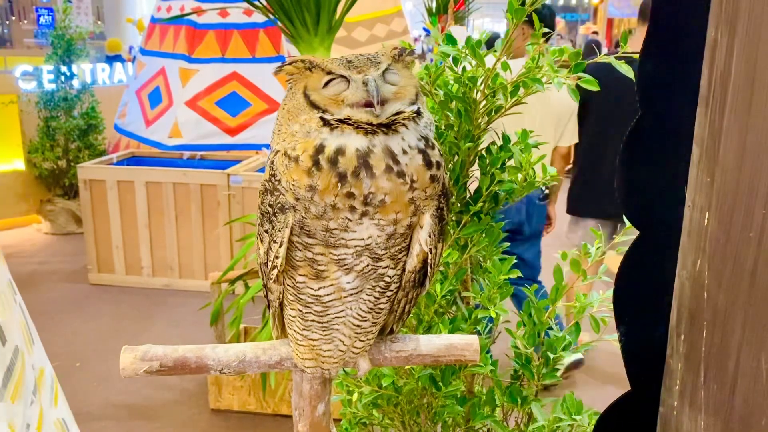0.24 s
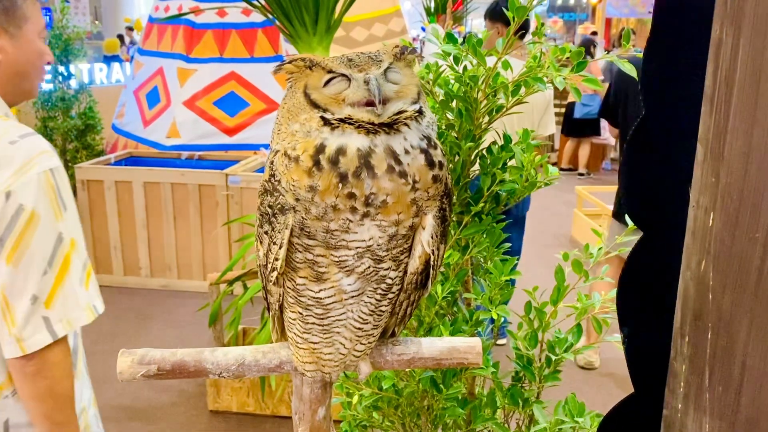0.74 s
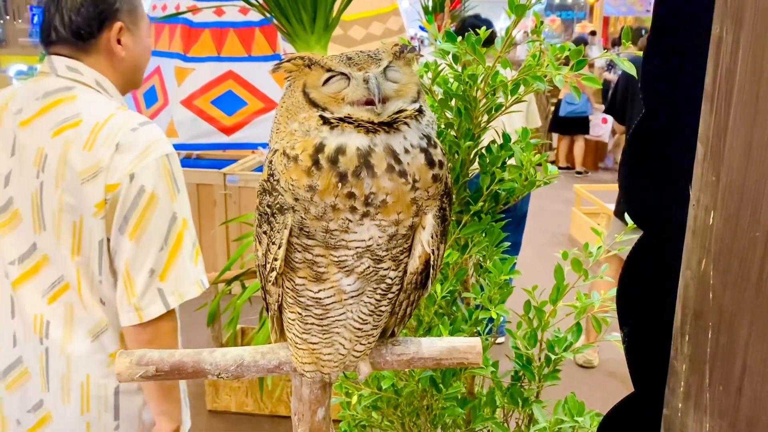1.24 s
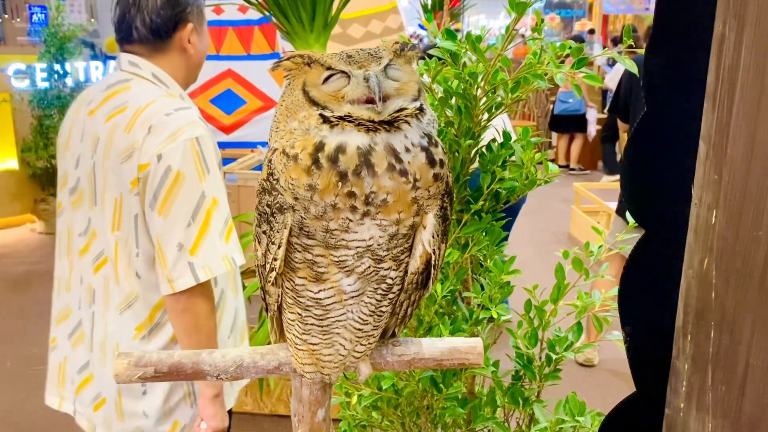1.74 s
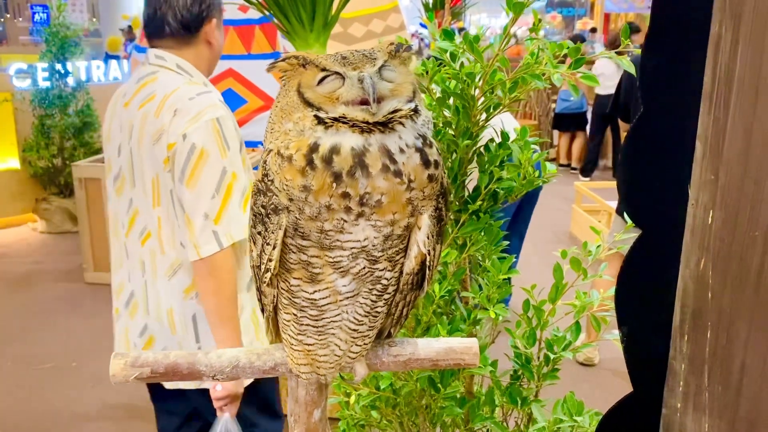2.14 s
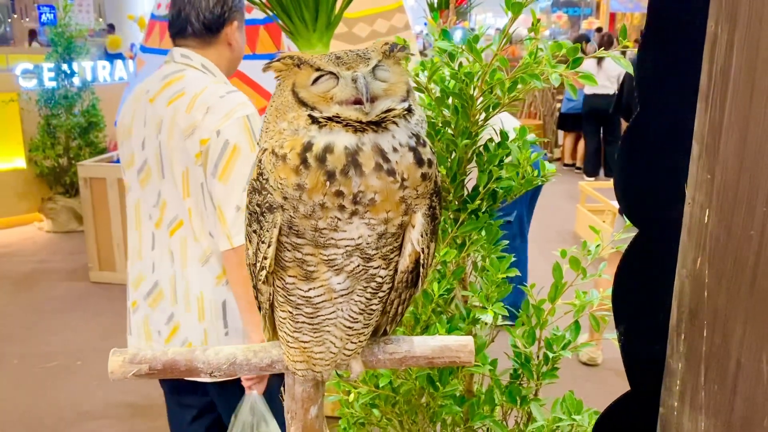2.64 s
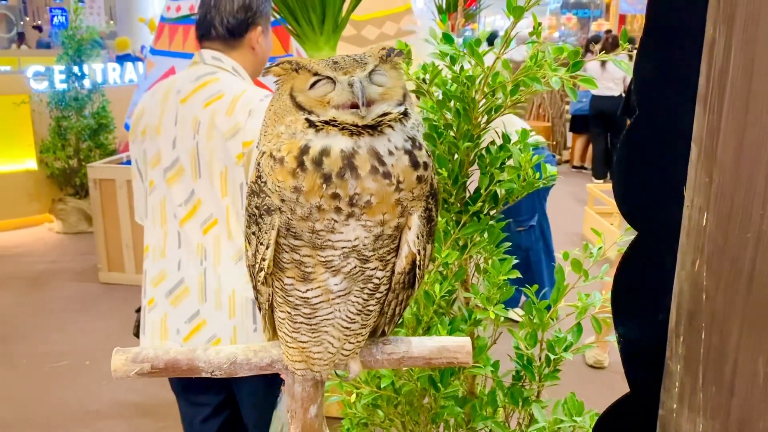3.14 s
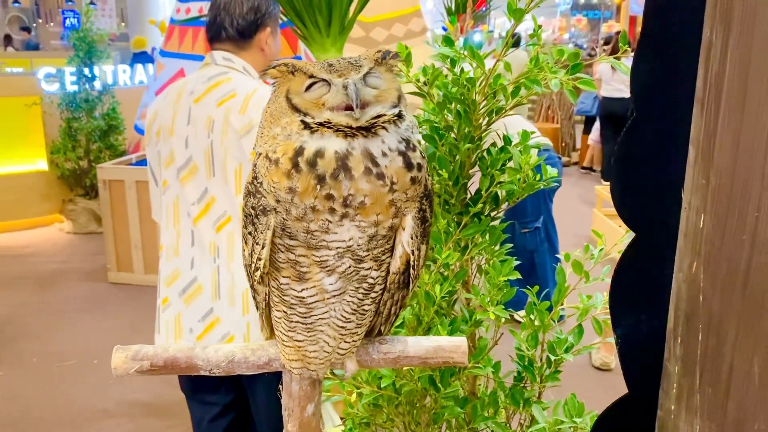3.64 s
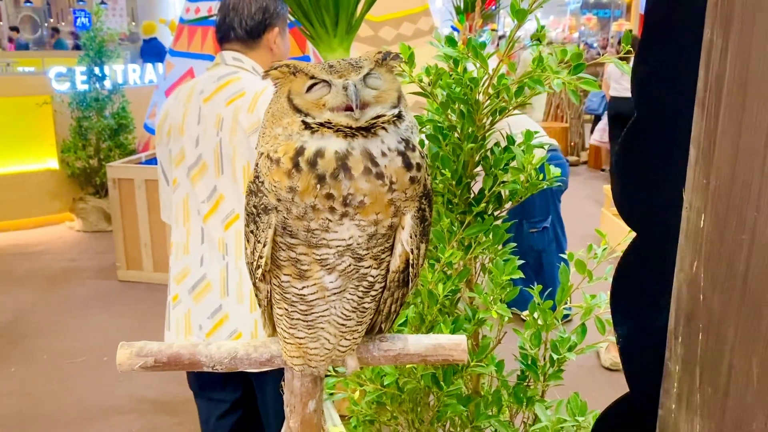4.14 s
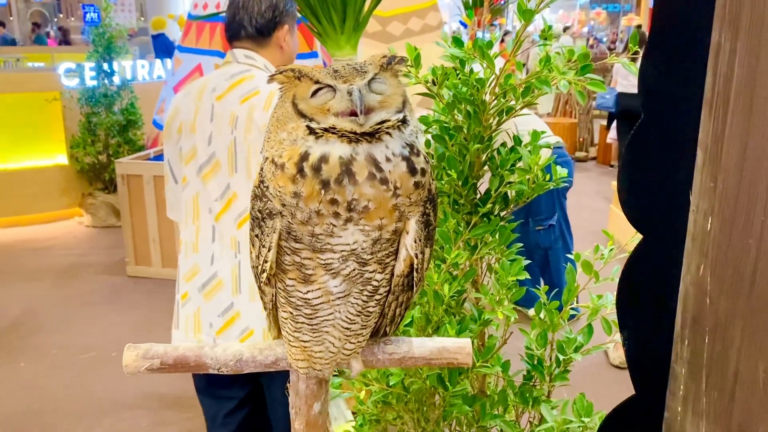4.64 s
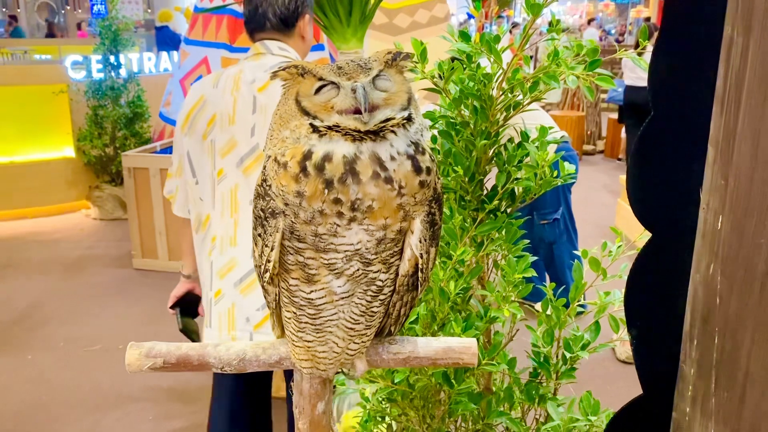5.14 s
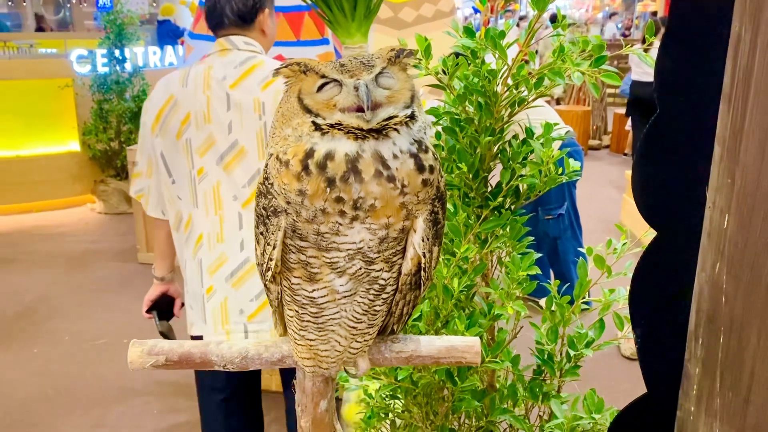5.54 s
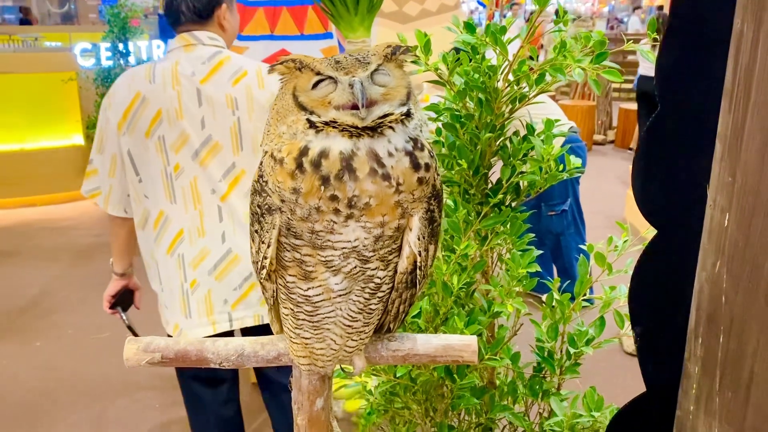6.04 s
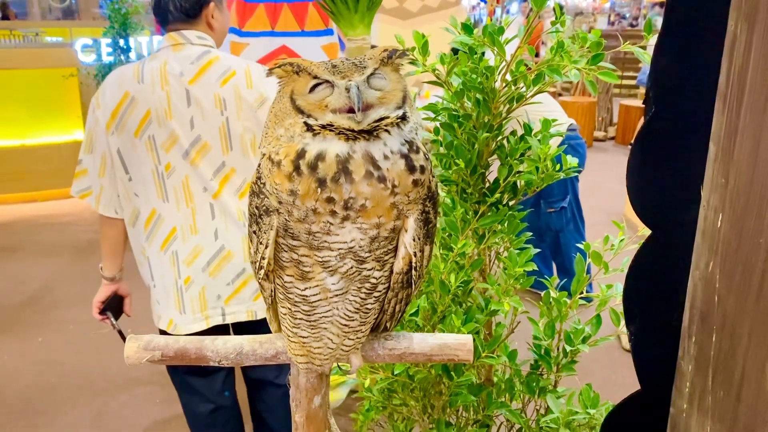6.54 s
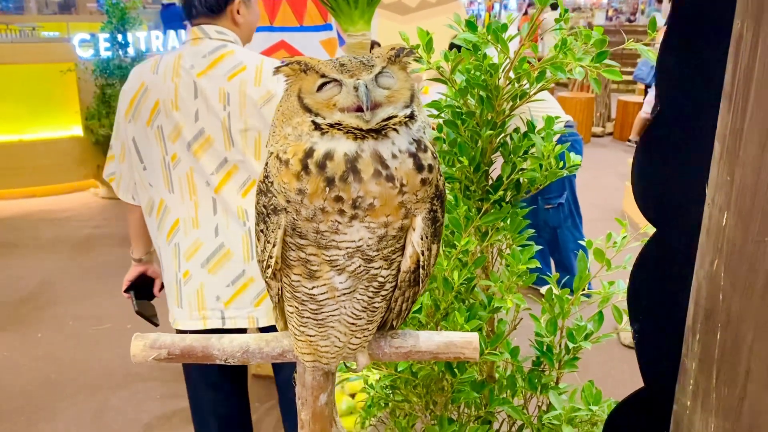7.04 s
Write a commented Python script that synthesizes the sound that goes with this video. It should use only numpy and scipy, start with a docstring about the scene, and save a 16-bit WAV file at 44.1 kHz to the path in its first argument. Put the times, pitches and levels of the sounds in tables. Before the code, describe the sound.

An owl dominates, recorded close on a phone in a lightly echoing hall. Its first call is a rapid husky stutter growing into two loud, round hoots; a long quiet gap follows with a faint chorus of croaking frogs, trilling crickets and low air rumble. A tiny tick and far peeps pass. A second stuttering call climbs to full hoots, then a dull low bump and a raspy cricket close the scene.

```python
"""From the start: ventilation rumble and a faint night chorus of frogs and crickets, probably from loudspeakers.
At 0.2 s and 4.9 s a great horned owl, close by in an indoor hall, stutters and swells into full hoots.
The rumble, frogs, trills and far singers sink while it is loud; rasps and buzzes do not.
A thin tick at 2.3 s and soft peeps from 2.8 s; a soft thump at 6.5 s.
Calls are arched tones with harmonics, hiss and echoes; the rest is shaped noise and short gliding tones."""
import sys
import numpy as np
from scipy import signal
from scipy.fft import rfft, irfft, next_fast_len
from scipy.io import wavfile
from scipy.ndimage import uniform_filter1d, minimum_filter1d

SR = 44100
rng = np.random.default_rng(int(sys.argv[2]) if len(sys.argv) > 2 else 0)


def transcribe(u):
    """Save the signal u as a 16-bit wav file named by the first command-line argument.

    u: samples, shape (n,) or (channels, n), limited to [-1, 1]; the rate is SR.
    q: integer samples, one column per channel.
    """
    v = np.clip(np.atleast_2d(u).T, -1, 1)
    q = np.round(v * 32767).astype(np.int16)
    wavfile.write(sys.argv[1], SR, q)


N = 321974
T = np.arange(N) / SR


def undb(db):
    """Decibels to gain."""
    return 10 ** (np.asarray(db) / 20)


def unit(x):
    """Scale to rms 1."""
    return x / np.sqrt(np.mean(x ** 2))


def curve(rows, axis=1):
    """One table column, joined by straight lines in time."""
    rows = np.array(rows)
    return np.interp(T, rows[:, 0], rows[:, axis])


def add(out, s, x):
    """Mix x into out from time s on."""
    i = int(round(s * SR))
    a, b = max(i, 0), min(i + len(x), N)
    if b > a:
        out[a:b] += x[a - i:b - i]


def progress(length_s):
    """Ramp from 0 to 1 over a note."""
    return np.linspace(0, 1, max(int(length_s * SR), 2))


def phase_of(hz):
    """Running phase of a moving pitch."""
    return 2 * np.pi * np.cumsum(hz) / SR


def smooth_twice(x, size):
    """Two passes of a moving average."""
    return uniform_filter1d(uniform_filter1d(x, size), size)


def noise(points):
    """Unit-rms noise with a spectrum of (Hz, dB) points."""
    hz, db = np.transpose(points)
    size = next_fast_len(N)
    f_hz = np.maximum(np.fft.rfftfreq(size, 1 / SR), 1)
    gain = undb(np.interp(np.log(f_hz), np.log(hz), db))
    return unit(irfft(rfft(rng.standard_normal(size)) * gain, size)[:N])


def band(x, hz, width_hz):
    """Steep band-pass around one resonance."""
    edges_hz = np.clip([hz - width_hz / 2, hz + width_hz / 2], 5, .45 * SR)
    return signal.sosfilt(signal.butter(2, edges_hz, "bandpass", fs=SR, output="sos"), x)


def band_noise(hz, width_hz):
    """Unit-rms noise ringing in one resonance."""
    return unit(band(rng.standard_normal(N), hz, width_hz))


def walk(rate_hz):
    """Smooth random drift of rms 1."""
    k = int(SR / rate_hz)
    steps = np.repeat(rng.standard_normal(N // k + 1), k)[:N]
    return unit(uniform_filter1d(steps, k))


# broadband rumble spectrum: f/Hz, relative level/dB
RUMBLE_SPECTRUM = [(12, -38), (20, -10.5), (27, -8), (82, 0), (214, -16), (519, -13.5), (809, -23.5),
                   (980, -24), (1500, -33), (1680, -35), (2000, -34.5), (2600, -61.5), (4400, -120)]
# drone lines: t/s, low-line level/dB, upper-line level/dB (before upper_trim_db)
DRONE_LEVELS = [(0, -70, -72.5), (1.5, -68.5, -67.5), (4.3, -71.5, -78), (4.6, -64.5, -70),
                (6.3, -69, -78.5), (6.7, -61, -71), (7.3, -62, -68.5)]


def ventilation(rumble_db=-67, upper_trim_db=-2, top_line_db=-77):
    """Low rumble with three unsteady drone lines, each a narrow band of noise."""
    rumble = undb(rumble_db + .4 * walk(3.4)) * noise(RUMBLE_SPECTRUM)
    low_line = undb(curve(DRONE_LEVELS, axis=1)) * band_noise(63, 15)
    upper_line = undb(curve(DRONE_LEVELS, axis=2) + upper_trim_db) * band_noise(96, 7)
    return rumble + low_line + upper_line + undb(top_line_db) * band_noise(147, 14)


# smooth chorus wash spectrum: f/Hz, relative level/dB
WASH_SPECTRUM = [(2000, -10), (2500, -4.5), (3100, 4.5), (4000, -3), (4800, -6.5), (5700, -7.5),
                 (6400, -5.5), (7200, -11.5), (8200, -12.5), (9900, -10), (15500, -8.5)]
# unseen insects and frogs further off: f/Hz, width/Hz, chirp rate/Hz, level/dB
FAR_VOICES = [(2400, 300, 3, -80), (3300, 770, 24, -75), (5250, 200, 1.4, -78), (6290, 300, 1.6, -76.5),
              (8660, 400, 4.5, -79), (9450, 138, 1.8, -82)]


def far_singers(wash_db=-67.5, depth_db=5):
    """Narrow bands that pulse, each at its own unsteady pace, over a smooth wash."""
    out = undb(wash_db + .9 * walk(14)) * noise(WASH_SPECTRUM)
    for hz, width_hz, rate_hz, db in FAR_VOICES:
        beat = np.sin(phase_of(rate_hz * (1 + .15 * walk(3))))
        level = undb(depth_db * beat + 1.5 * walk(4))
        out += undb(db) * unit(level * band_noise(hz, width_hz))
    return out


def swells(first_s, spell_s, period_s, length_s, warm_up_db, warm_up_chirps):
    """Level of evenly spaced chirps, each a rounded rise and fall; the first ones are softer."""
    level = np.zeros(N)
    shape = np.sin(np.pi * progress(length_s)) ** 2
    for k, s in enumerate(first_s + np.arange(0, spell_s, period_s)):
        add(level, s - length_s / 2, undb(warm_up_db * np.exp(-k / warm_up_chirps)) * shape)
    return level


# rasping cricket: first chirp t/s, spell length/s, period/s, f/Hz, level/dB
RASP_SPELLS = [(-.515, 1.41, 0.1664, 4995, -64), (5.721, 1.7, .1613, 5060, -53)]


def rasps(stroke_hz=82, scrape=0.75):
    """A nearer cricket: fast, uneven wing strokes on one ringing pitch, with some scraping noise."""
    out, wander_hz = np.zeros(N), 25 * walk(100)
    scraping = scrape * band_noise(5060, 260)
    stroke = phase_of(stroke_hz * (1 + 0.044 * walk(60)))
    for first_s, spell_s, period_s, hz, db in RASP_SPELLS:
        ring = np.sin(phase_of(hz + wander_hz) + 0.44 * np.sin(stroke + 1))
        tone = (1 + 0.48 * np.cos(stroke)) * ring
        level = swells(first_s, spell_s, period_s, length_s=0.17, warm_up_db=-16, warm_up_chirps=1.1)
        out += undb(db) * level * unit(unit(tone) + scraping)
    return out


def pips(hz=2790, pip_s=.016, pip_db=-56.5, pip_rate_hz=24.5, first_s=-.13, run_every_s=.352, rest_s=.06):
    """A second frog: runs of short falling pips, scattered in time, level and pitch."""
    out, u = np.zeros(N), progress(pip_s)
    for start_s in np.arange(first_s, T[-1], run_every_s):
        end_s = start_s + run_every_s - rest_s * (.5 + rng.random())
        for s in np.arange(start_s, end_s, 1 / pip_rate_hz):
            late, loud, sharp = rng.standard_normal(3)
            tone = np.sin(phase_of(hz * (1 + .01 * sharp + .04 * (.5 - u))))
            pip = undb(pip_db + 1.5 * loud) * np.sin(np.pi * u) ** 2 * tone
            add(out, s - pip_s / 2 + 0.0018 * late, pip)
    return out


# near surfaces that throw sound back: delay/ms, level/dB
ECHOES = [(8.5, -21), (19, -20), (33, -17)]


def hall(x, wet_db, gap_s=0.0076, t60_s=.12):
    """A few near echoes, plus a short diffuse tail of decaying noise."""
    t = T[:SR // 2]
    decay = undb(-60 * t / t60_s) * np.clip(t / gap_s - 1, 0, 1)
    tail = rng.standard_normal(len(t)) * decay
    out = x + undb(wet_db) * signal.fftconvolve(x, tail / np.linalg.norm(tail))[:N]
    for ms, db in ECHOES:
        out = out + undb(db) * np.interp(T - ms / 1000, T, x, left=0)
    return out


# frog bouts: last note t/s, length/s, period/s, slowing/s, swell/s, f/Hz, level/dB (before croak_db)
CROAK_BOUTS = [(.689, .72, 0.044, .026, 1.55, 3400, -52.5), (1.016, 0.32, .044, .003, .6, 3250, -47.5),
               (3.375, 1.7, .0465, .056, 1.1, 3470, -53), (4.98, 1, .0453, .001, .56, 3236, -46),
               (6.449, 1.25, 0.048, 0.047, 1.05, 3460, -55)]


def croak_notes(swell_db=18, slowing_notes=1.4, scatter_db=1.5):
    """Time, pitch and level of each croak: a bout starts soft, levels off and drags out its last notes."""
    for last_s, length_s, period_s, slowing_s, swell_s, hz, db in CROAK_BOUTS:
        # counted back from the last note
        for k, chance in enumerate(rng.standard_normal(size=50)):
            before_s = k * period_s + slowing_s * (1 - np.exp(-k / slowing_notes))
            if before_s < length_s:
                soft = 1 - np.exp(-(before_s / swell_s) ** 3)
                yield last_s - before_s, hz, db - swell_db * soft + scatter_db * chance


def croaks(croak_s=.034, sweep=.08, croak_db=1.46, octave_db=-22, grain_hz=170):
    """A frog's grainy, falling notes: tone plus a noisy buzz in the throat resonance."""
    out, buzz_level = np.zeros((2, N))
    u = progress(croak_s)
    swell = np.sin(np.pi * u ** 2.2) ** 2
    for s, hz, db in croak_notes():
        grain = 1 + .6 * np.sin(2 * np.pi * (grain_hz * croak_s * u + rng.random()))
        note = undb(db + croak_db) * swell * grain
        phase = phase_of(hz * (1 + sweep * (.6 - u)))
        add(out, s - 0.93 * croak_s, note * (np.sin(phase) + undb(octave_db) * np.sin(2 * phase)))
        add(buzz_level, s - 0.98 * croak_s, note)
    return out + buzz_level * band_noise(3400, 600) * .42


def trills(first_s=.124, every_s=.601, trill_db=-59, hz=6130, stroke_rate_hz=65, stroke_s=0.011,
           sweep=0.058, scatter_db=1, count=15):
    """A cricket's evenly timed trills: each wing stroke falls in pitch; the first few are flat and weak."""
    out, u = np.zeros(N), progress(stroke_s)
    for s in np.arange(first_s, T[-1] - .3, every_s):
        db = trill_db + scatter_db * rng.standard_normal()
        for k in range(count):
            slack = np.exp(-k / 2.1)
            pitch_hz = hz * (1 - 0.058 * slack + sweep * (.5 - u) + .003 * rng.standard_normal())
            stroke = undb(db - 11 * slack) * np.sin(np.pi * u) * np.sin(phase_of(pitch_hz))
            add(out, s + k / stroke_rate_hz, stroke)
    return out


def hoot(length_s, top_hz, db, octave_db, rise=.16, fall=0.19, inset_s=.008, throat_db=-0.17,
         third_db=-62, whistle_db=12, air_db=-44, lead_s=.03):
    """A near-pure tone, pitch arching with air pressure; returns start offset, fundamental, overtones."""
    attack_s, release_s, jitter = .0034, .004, .005
    t = np.arange(-lead_s, length_s + lead_s, 1 / SR)
    u = np.clip(t / length_s, 0, 1)
    sag = np.where(u < .45, rise * (1 - u / .45) ** 2, fall * ((u - .45) / .55) ** 2)
    opening = 1 + np.exp((inset_s - t) / attack_s)
    closing = 1 + np.exp((t - length_s + inset_s) / release_s)
    pressure = 1 / opening / closing
    # the swollen throat rings best at the top of the arch
    effort = undb(db + throat_db * (10 * sag) ** 2) * pressure
    wobble, flutter = (unit(smooth_twice(rng.standard_normal(len(t)), 180)) for _ in range(2))
    # soft hoots are less steady, and short ones arch less
    wobble = wobble * (1 - db / 22)
    phase = phase_of(top_hz * (1 - sag * (length_s / 0.078) ** 0.32 + jitter * wobble))
    octave = band(effort * undb(octave_db + 2 * flutter) * np.sin(2 * phase), 1420, 660)
    third = undb(third_db) * effort * np.sin(3 * phase)
    # on hard, bright hoots the seventh harmonic crosses a narrow resonance and whistles
    whistle = undb(whistle_db + 2.42 * octave_db) * effort ** 5 * band(np.sin(7 * phase), 5575, 120)
    # air escapes most as the throat opens
    hiss = rng.standard_normal(len(t))
    breath = unit(band(hiss, 1300, 1600) + 0.36 * band(hiss, 7000, 10000))
    air = breath * undb(air_db) * effort ** 1.6 * np.exp(-u / 0.11)
    return t[0], effort * np.sin(phase), octave + third + whistle + air


def mid_call(gap_s=0.23, ramp_s=.04):
    """Near 1 while another hoot is about to follow, 0 once the call is over."""
    waiting = np.any([(T < s) & (T > s - gap_s) for s, _, _ in HOOTS], axis=0)
    return uniform_filter1d(waiting.astype(float), int(ramp_s * SR))


# notes climb and lengthen from stutter to full hoots: t/s, top f/Hz, note length/s
CALL_SHAPE = [(.23, 671.3, .039), (.77, 721, 0.045), (1.02, 782.8, .06), (1.14, 829, .079),
              (4.9, 624.6, 0.049), (5.2, 688.8, .041), (5.65, 702, 0.046), (5.87, 779.3, .068),
              (6.02, 805.6, .091), (6.22, 805.7, .094)]
# hoots: middle t/s, level/dB (before throat and hall), octave level/dB re fundamental
HOOTS = [(.237, -35.5, -12), (.32, -42, -10), (.397, -31, -16), (.471, -31.5, -19), (.557, -26, -22.5),
         (.627, -30, -21.5), (.703, -31.5, -16), (.781, -23.5, -25.5), (.853, -18.5, -21.5),
         (.926, -14, -18.5), (1.019, -11, -24.5), (1.14, -5.5, -20), (4.905, -50.5, -20),
         (4.99, -33, -24.5), (5.065, -31.5, -22), (5.144, -34.5, -15.5), (5.225, -34.5, -7),
         (5.308, -27, -24.5), (5.384, -25, -25), (5.458, -30.5, -16.5), (5.532, -29, -9),
         (5.608, -24.5, -4), (5.683, -22.5, -1), (5.767, -16.5, -10), (5.869, -9.5, -8.5), (6.017, -3, -14),
         (6.218, -8.5, -8)]


def owl(hall_db=-15, haze_db=-26.5, husk_tilt_db=2, haze_s=.055, haze_lead_s=0.016, overtone_wet_db=4):
    """Hoots in the hall; between them the throat keeps up a husky tone that swells into the next one."""
    low, high = np.zeros((2, N))
    top_hz, length_s = curve(CALL_SHAPE, axis=1), curve(CALL_SHAPE, axis=2)
    for s, db, octave_db in HOOTS:
        i = int(s * SR)
        offset_s, fundamental, overtones = hoot(length_s[i], top_hz[i], db, octave_db)
        start_s = s - length_s[i] / 2 + offset_s
        add(low, start_s, fundamental)
        add(high, start_s, overtones)
    out = hall(low, hall_db) + hall(high, hall_db + overtone_wet_db)
    phase = phase_of(.93 * top_hz)
    size, husk = int(haze_s * SR), undb(haze_db) * mid_call()
    for k, partial in enumerate((low, high), 1):
        swell = np.interp(T + haze_lead_s, T, smooth_twice(np.abs(partial), size))
        # exponent below 1: soft hoots are huskier than hard ones
        level = husk * undb(husk_tilt_db * (k - 1.5)) * np.abs(swell) ** 0.8
        husky_tone = band_noise(65, 77) * np.sin(k * phase) + band_noise(65, 77) * np.cos(k * phase)
        out += level * husky_tone
    return out


# high katydid: first buzz t/s, spell length/s, period/s, level/dB
BUZZ_SPELLS = [(.92, .88, .196, -64), (3.85, .8, .18, -76.5), (6.59, .83, .186, -64)]


def katydid():
    """Spells of very high, noisy buzzes."""
    level = np.zeros(N)
    for first_s, spell_s, period_s, db in BUZZ_SPELLS:
        level += undb(db) * swells(first_s, spell_s, period_s, length_s=.25, warm_up_db=-13, warm_up_chirps=.8)
    return level * band_noise(11500, 600)


def tick(s=2.255, db=-63, decay_s=0.074):
    """One thin, high tick: band noise with a sudden onset and a short hissing decay."""
    return undb(db) * (T > s) * np.exp(-np.abs(T - s) / decay_s) * band_noise(9900, 3000)


# lone soft peeps: middle t/s, length/s, f/Hz, level/dB
PEEPS = [(2.784, 0.08, 1145, -53), (3.03, 0.087, 2202, -66), (3.902, 0.0804, 2330, -61),
         (6.6, .12, 2300, -63)]


def peeps(waver=0.032):
    """Soft, far whistles with a slightly wavering pitch."""
    out, wobble = np.zeros(N), walk(150)
    for s, length_s, hz, db in PEEPS:
        u = progress(length_s)
        pitch_hz = hz * (1 + waver * wobble[int(s * SR):][:len(u)])
        add(out, s - length_s / 2, undb(db) * np.sin(np.pi * u) ** 2 * np.sin(phase_of(pitch_hz)))
    return out


def thump(s=6.536, hz=61, width_s=0.02, db=-33, knock_hz=160, knock_db=-49):
    """A soft, padded bump: a few cycles of deep boom and a little knock as it begins."""
    t = T - s
    boom = undb(db) * np.exp(-(t / width_s) ** 2) * -np.sin(2 * np.pi * hz * t)
    knock = undb(knock_db) * np.exp(-((t + width_s) / 0.009) ** 2) * np.cos(2 * np.pi * knock_hz * t)
    return boom + knock


def ducking(call, depth_db=-6, threshold_db=-31, hold_s=0.068, ramp_s=.06, lag_s=0.023):
    """Background gain: it sinks while the owl is loud and comes back just after."""
    peak = -minimum_filter1d(-np.abs(call), size=int(hold_s * SR))
    loud = uniform_filter1d(np.minimum(peak / undb(threshold_db), 1), int(ramp_s * SR))
    return undb(depth_db * np.interp(T - lag_s, T, loud))


# slow drift of the chorus: t/s, level/dB
CHORUS_DRIFT = [(0, -3), (1.5, -0.14), (4.9, -1.5), (6.5, 1.03)]


def scene(rumble_duck=.4, frogs_wet_db=-14):
    """The owl in front; chorus and ventilation far behind."""
    call = owl()
    duck = ducking(call)
    # the rumble ducks by only part of the full depth
    room = ventilation() * duck ** rumble_duck + peeps() + tick() + thump()
    singers = far_singers() + hall(croaks(), frogs_wet_db) + trills() + pips()
    chorus = singers * duck * undb(curve(CHORUS_DRIFT))
    return (call + room + chorus + rasps() + katydid())[None]


def record(dry, ceiling=.96, top_hz=15550):
    """A limiter holds peaks to the ceiling; a steep low-pass then cuts the top of the treble."""
    peak = -minimum_filter1d(-np.abs(dry), size=900)
    gain = smooth_twice(np.minimum(1, ceiling / peak), 400)
    return signal.sosfilt(signal.ellip(10, .2, 70, top_hz, fs=SR, output="sos"), dry * gain)


dry = scene()
out = record(dry)
transcribe(out)
```